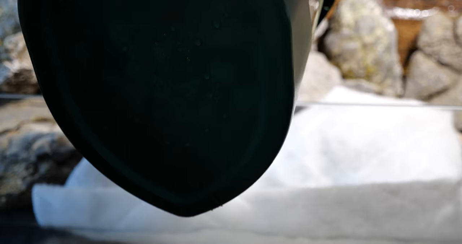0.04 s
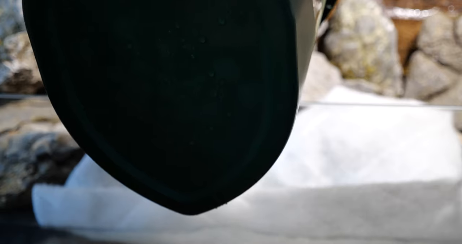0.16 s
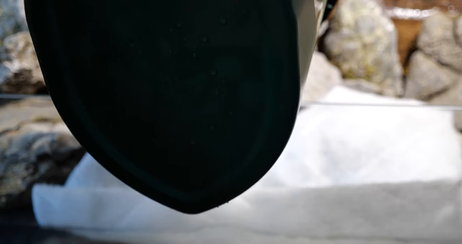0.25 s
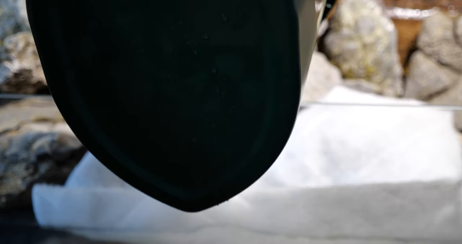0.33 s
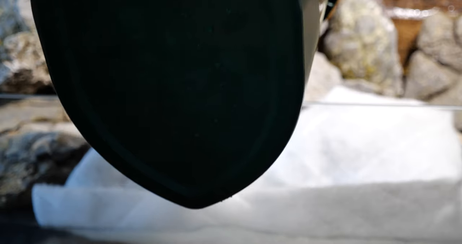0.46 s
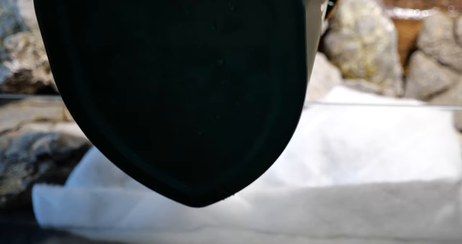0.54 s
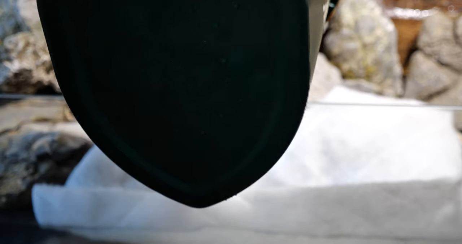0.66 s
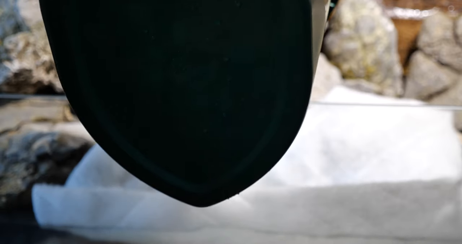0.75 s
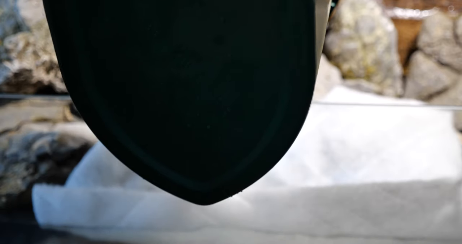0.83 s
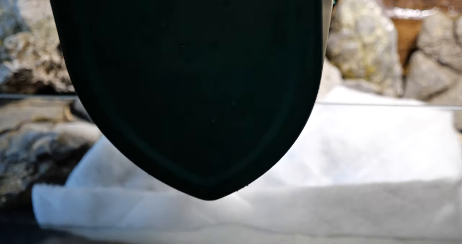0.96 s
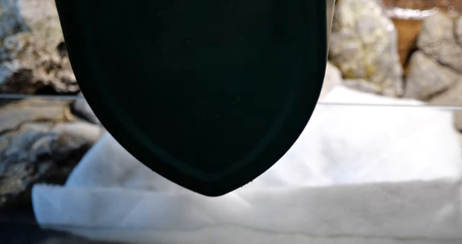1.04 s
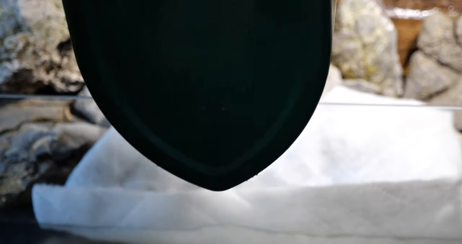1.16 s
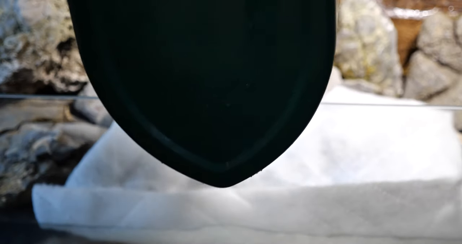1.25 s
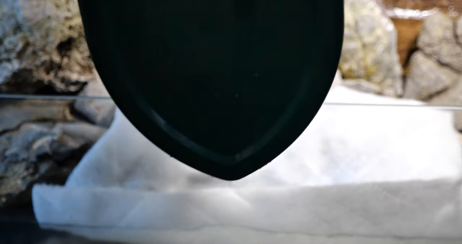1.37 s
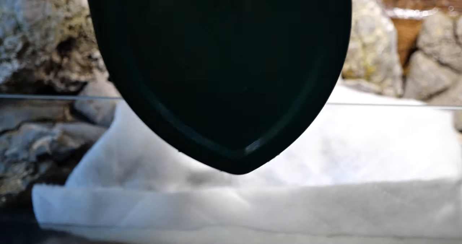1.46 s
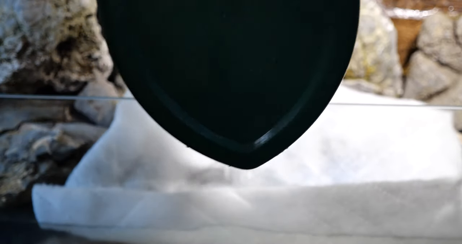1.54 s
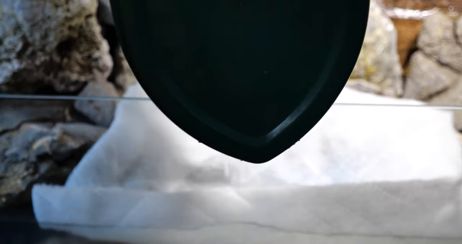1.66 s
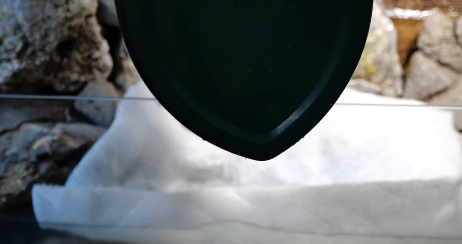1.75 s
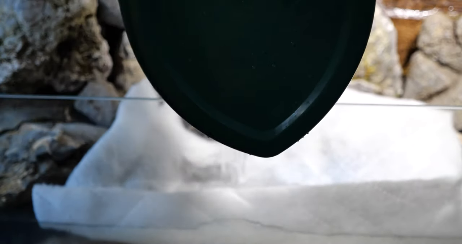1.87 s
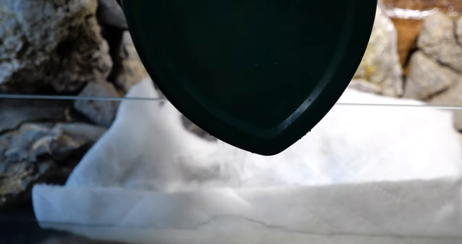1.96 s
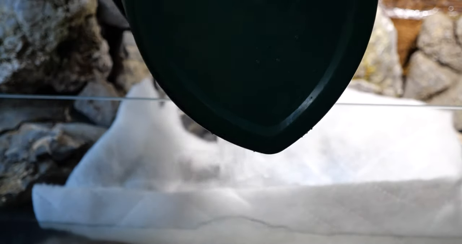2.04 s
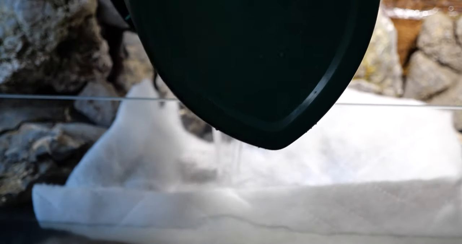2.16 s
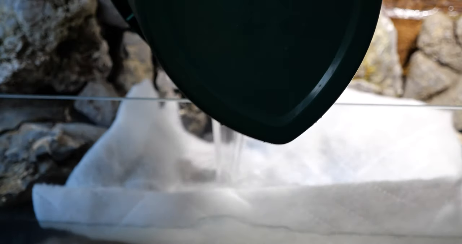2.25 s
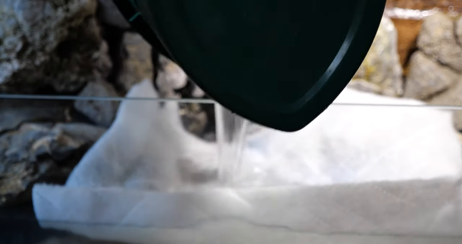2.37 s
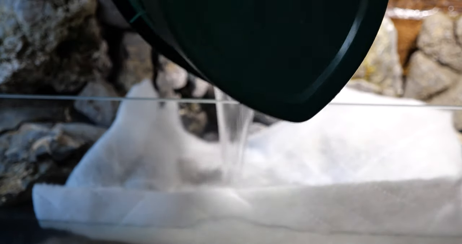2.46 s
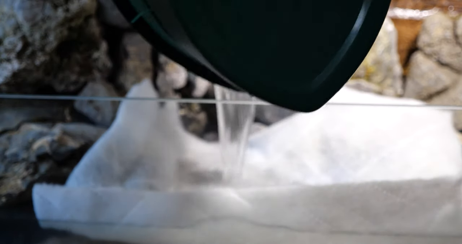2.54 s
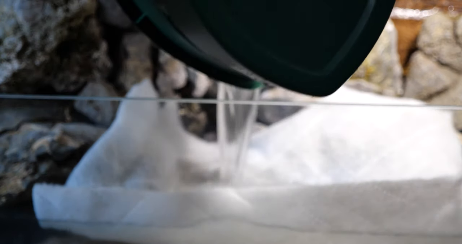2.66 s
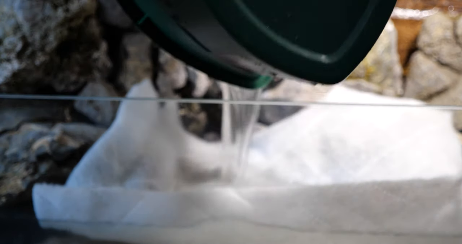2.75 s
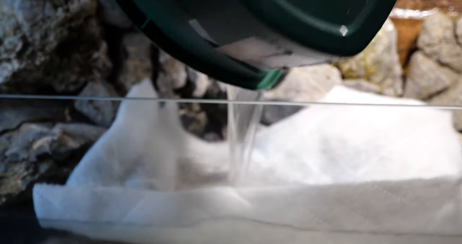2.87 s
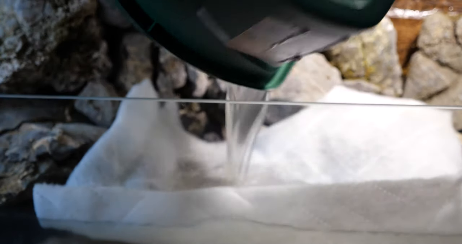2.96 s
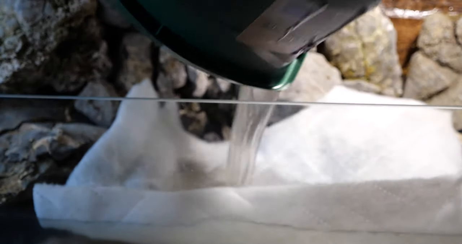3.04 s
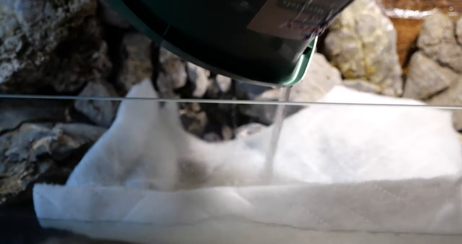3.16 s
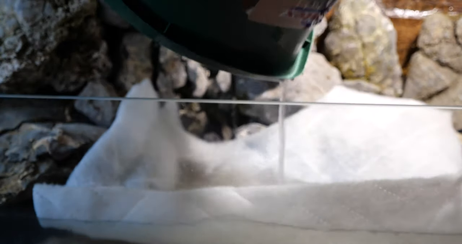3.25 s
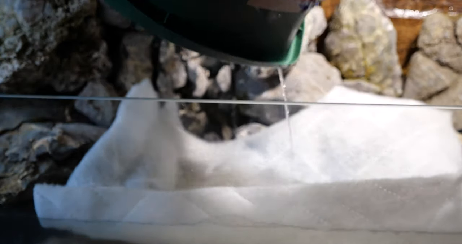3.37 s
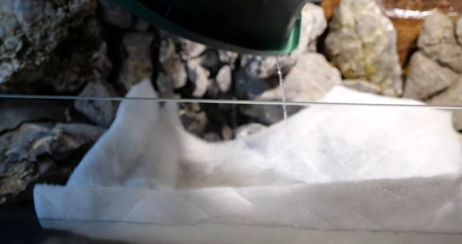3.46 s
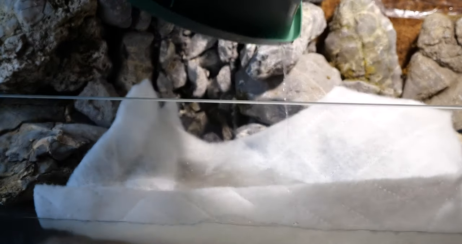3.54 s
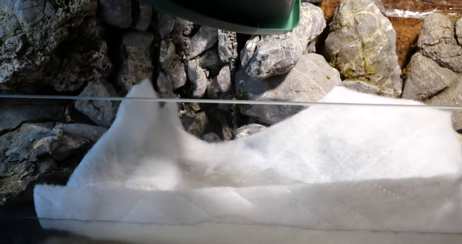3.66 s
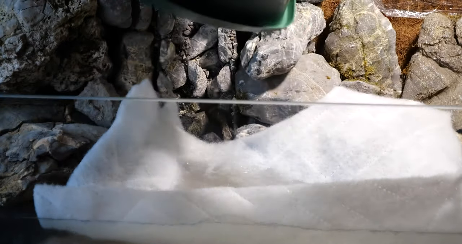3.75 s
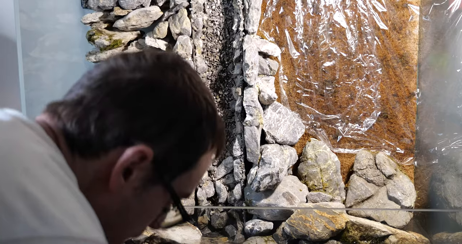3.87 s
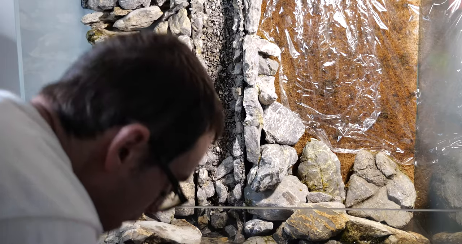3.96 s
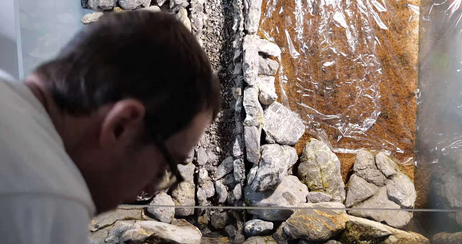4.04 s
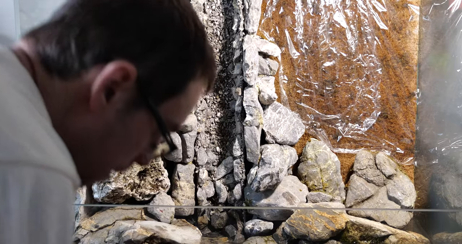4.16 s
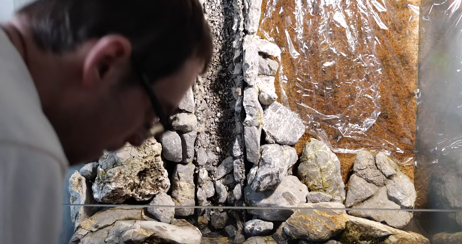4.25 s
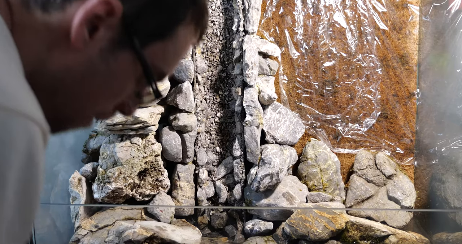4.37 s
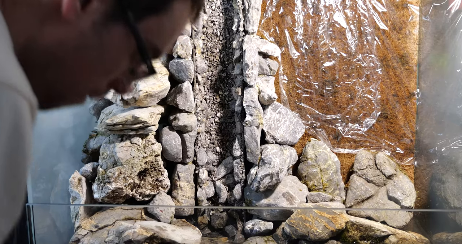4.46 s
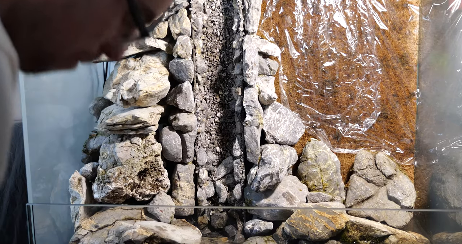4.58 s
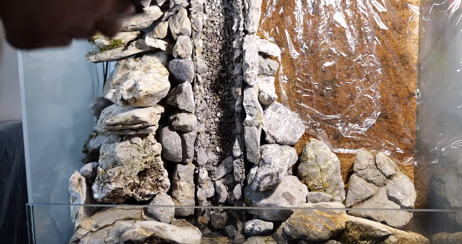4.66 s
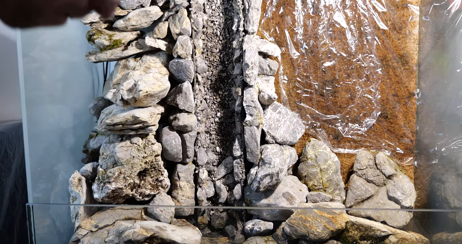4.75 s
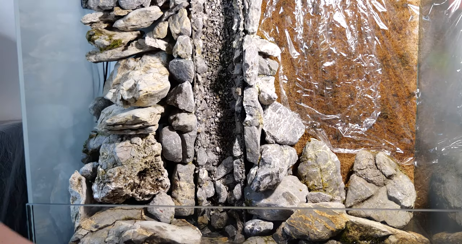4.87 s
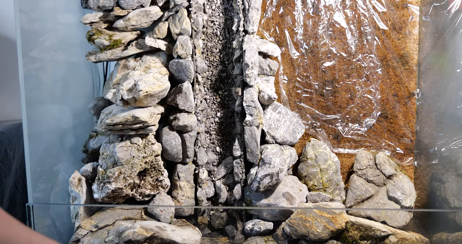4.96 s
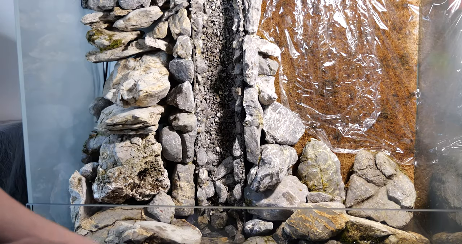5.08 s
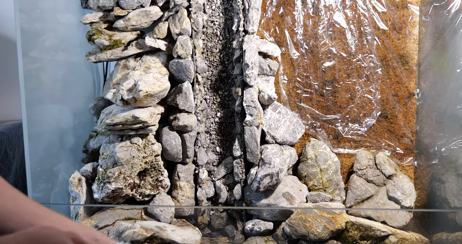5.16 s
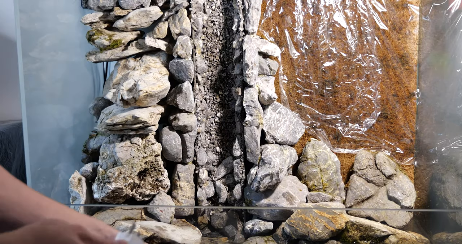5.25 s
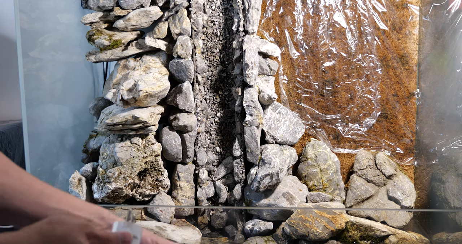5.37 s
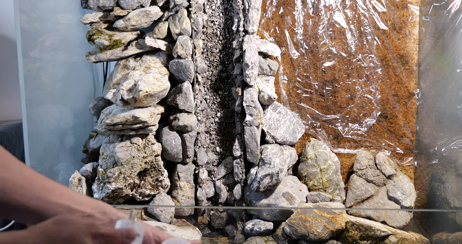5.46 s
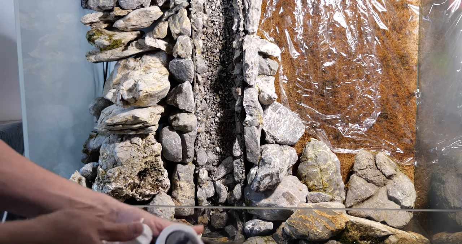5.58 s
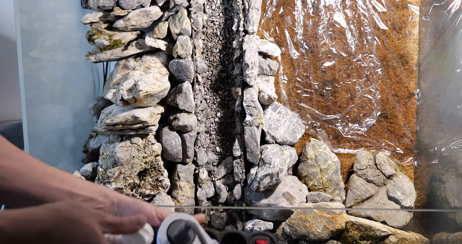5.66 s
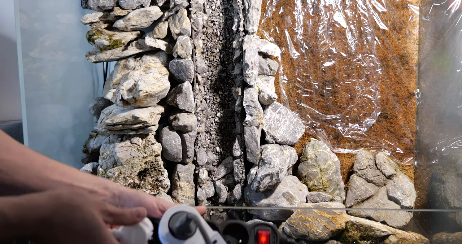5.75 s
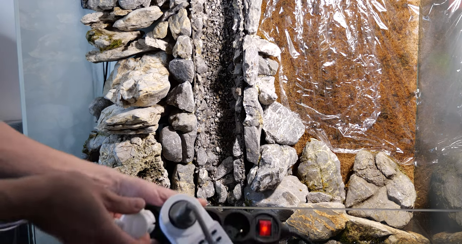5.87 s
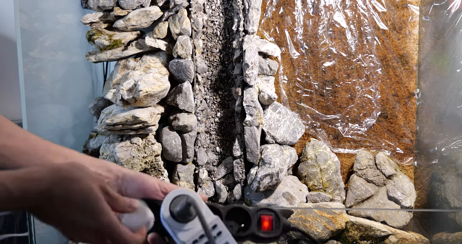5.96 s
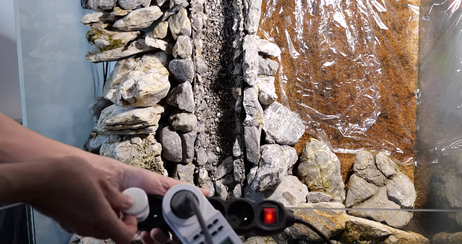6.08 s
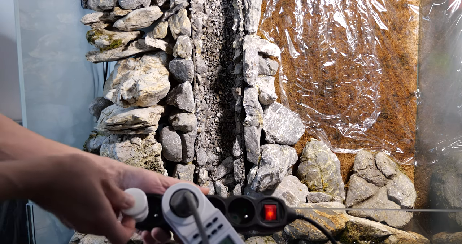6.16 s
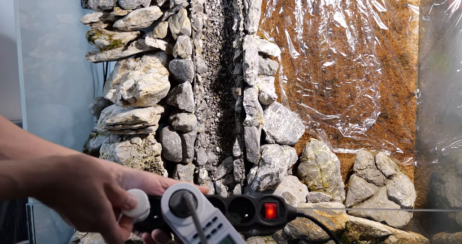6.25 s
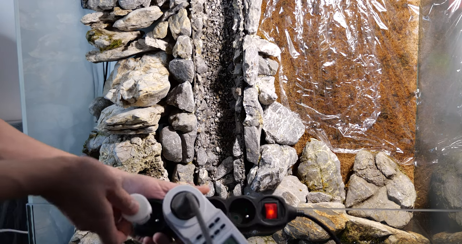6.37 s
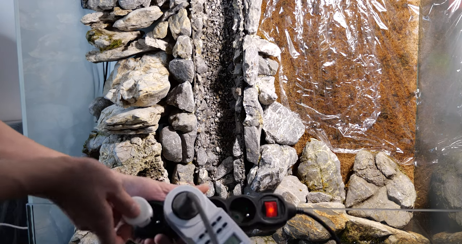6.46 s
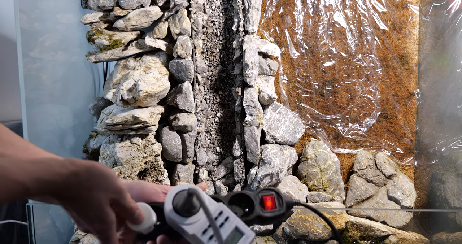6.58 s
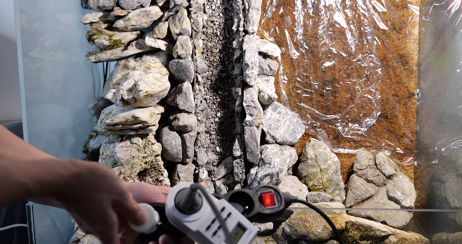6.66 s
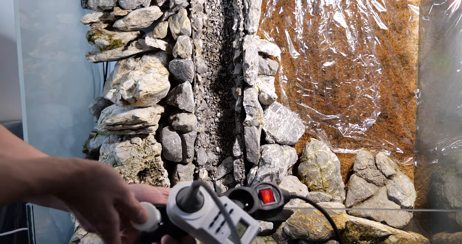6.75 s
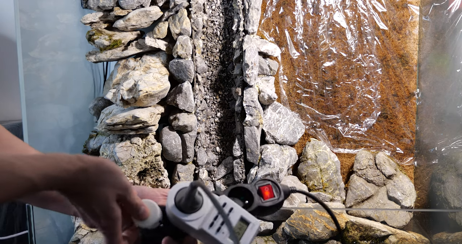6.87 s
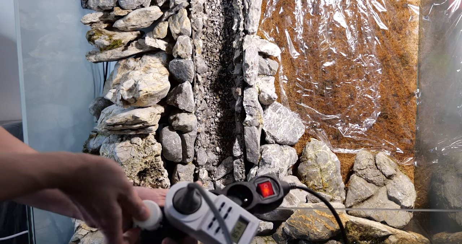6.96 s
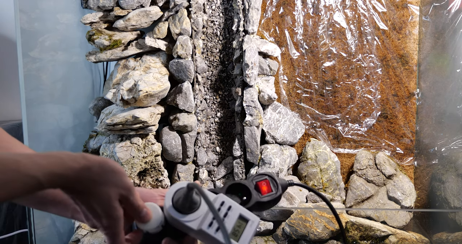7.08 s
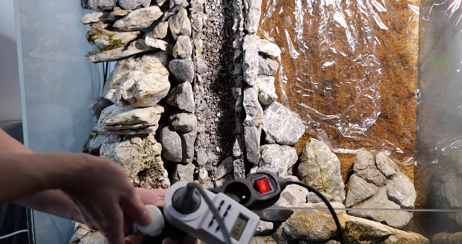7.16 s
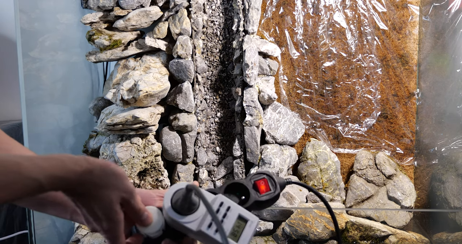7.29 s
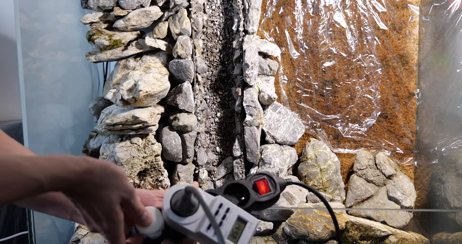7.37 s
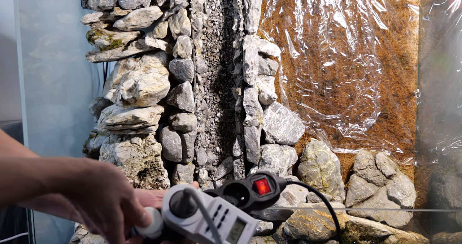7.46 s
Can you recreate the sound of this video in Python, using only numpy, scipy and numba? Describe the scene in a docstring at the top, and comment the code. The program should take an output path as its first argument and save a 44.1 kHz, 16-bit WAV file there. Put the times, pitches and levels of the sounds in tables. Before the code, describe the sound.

Gurgling, splashing water trickles out, followed by a sharp hollow bucket knock, a short scrape and light plastic handling in a small room.

```python
"""Water gurgles, sprays and splashes from a bucket onto fleece in a glass tank, then thins to drips.
The empty bucket is set down and slid away; hands knock and shuffle a plastic power strip; a small
room hums. Each bubble rings as a damped oscillator, higher the smaller it is. The bucket booms as a
cavity resonator; impact and friction excite the modes of the plastic."""
import sys
import numpy as np
from scipy import signal
from scipy.fft import rfft, irfft
from scipy.io import wavfile
from scipy.ndimage import uniform_filter1d
from numba import njit

SR = 44100
rng = np.random.default_rng(int(sys.argv[2]) if len(sys.argv) > 2 else 0)


def log_audio(samples):
    """Write samples as a 16-bit WAV file to the path given in sys.argv[1]."""
    # one column per channel
    frames = np.atleast_2d(samples).T
    # limit to full scale, then quantise
    limited = np.clip(frames, -1, 1)
    pcm = np.round(limited * 32767).astype(np.int16)
    wavfile.write(sys.argv[1], SR, pcm)


N = 331632
TIME_S = np.arange(N) / SR
STILL_S = 3.6  # from here on drips fall into still water
TOP_HZ = 15800

# spectrum of fine spray: frequency_hz, density_db
SPRAY_SPECTRUM = [(2650, -5.5), (4500, -0.5), (6590, -8), (9390, -2.5), (12500, -3.5), (14800, -10),
                  (15700, -10.5)]
# resonances of the bucket's air and bottom: frequency_hz, width_hz, gain_db
BUCKET_MODES = [(313, 28, 13), (241, 36, -12), (139, 30, -13)]
# spectrum of the bucket's scrape and wet smack: frequency_hz, density_db
SCRAPE_SPECTRUM = [(120, -44.5), (250, -14), (400, -3), (650, 2.5), (1250, -7.5), (1700, -11), (2300, -19),
                   (4000, -74.5)]
# modes of the hard plastic: frequency_hz, gain_db, t60_s
PLASTIC_MODES = [(448, 1, 0.11), (681, 8.5, 0.024), (864, 8, 0.04), (1065, 5, 0.031), (1240, 6.5, 0.05),
                 (1483, 1.5, 0.052), (1655, -0.5, 0.063), (1824, 0.5, 0.058), (2270, 7.5, 0.032),
                 (2740, -3.5, 0.14), (4125, 5, 0.041), (4460, -11, 0.064), (5760, -6, 0.059)]
# spectrum of rustles and ticks on the plastic: frequency_hz, density_db
RUSTLE_SPECTRUM = [(400, -56), (1000, -15), (1900, -0.5), (3500, -3.5), (5500, -11), (12000, -40),
                   (15700, -36)]


def stream():
    """Air entrainment: the falling jet drives swarms of small and large bubbles and throws off mist."""
    # course of the pour: time_s, gurgle_db, deep_relative_db, spray_relative_db
    pour = [(0, -38, -10, -2), (0.42, -37.5, -12, -4.5), (0.56, -48, -3.5, 5.5), (0.64, -40, -8.5, 0.5),
            (0.69, -45, -5, 0), (0.78, -39.5, -11, -2), (0.9, -45, -10.5, -2.5), (1.06, -38.5, -10, -6),
            (1.26, -48, -9.5, -0.5), (1.5, -48, -5.5, 3), (1.62, -42.5, -7.5, -8.5),
            (1.7, -44.5, -9.5, -6.5), (1.82, -43, -2.5, -7), (2.13, -46.5, -11.5, -1.5),
            (2.24, -41, -9, -4.5), (2.4, -46, -7, -7.5), (2.55, -41.5, -8, -2), (2.62, -43, -19.5, -7.5),
            (2.74, -45.5, -8, -3.5), (2.9, -42.5, -14.5, -4), (3.08, -36.5, -10, -2),
            (3.17, -40.5, -5.5, -10), (3.25, -34, -8, -8.5), (3.42, -49, -1.5, -3), (3.5, -64.5, 0, 10.5),
            (3.82, -75.5, -3, 11.5)]
    # spectrum of small bubbles: frequency_hz, density_db
    small_spectrum = [(710, -42), (1200, -3.5), (1530, -2.5), (1660, -2), (1920, 2), (2510, -1), (3350, 0),
                      (7000, -9.5), (9100, -26), (15400, -120)]
    # spectrum of large bubbles: frequency_hz, density_db
    large_spectrum = [(60, -50), (100, -3.5), (170, -1.5), (330, -6), (560, -12.5), (760, 0), (1150, -1),
                      (1600, -7), (3000, -60)]
    gate, db, deep_db, spray_db = curves(pour)
    db = db + 2.5 * breakup() * walk(9)  # the stream sputters
    small = swarm([(800, -38)] + small_spectrum, 10000, low_hz=1295, span=4.99, patchy_db=4, wash_db=-7)
    large = swarm(large_spectrum, 2000, low_hz=180.6, span=7, patchy_db=3.5, wash_db=5)
    mist = swarm([(3000, -28)] + SPRAY_SPECTRUM, 6000, low_hz=5230, span=2.64, patchy_db=5.5, wash_db=0)
    gurgle = gate * undb(db) * (small + undb(deep_db) * large)
    return gurgle + spray(mist, flow=gate * undb(db + spray_db))


def breakup():
    """Jet instability: the stream starts even and grows patchy, on a scale of 0 to 1."""
    return np.interp(TIME_S, [0.4, 0.61], [0.22, 1])


def swarm(spectrum, count, low_hz, span, patchy_db, wash_db):
    """Bubble resonance: smaller bubbles ring higher and die sooner; each size range comes in patches."""
    when, pitch, strength = rng.random((count, 3)).T
    hz = low_hz * span ** pitch
    size = hz * undb(12 * strength)  # equal energy per Hz before colouring
    bubbles = rings(when * N / SR, hz, 40 / hz, size, rise_s=0.001, glide=0.27)
    even = colour(unit(bubbles) + undb(wash_db) * grit(1.6), spectrum)
    bands_hz = low_hz * span ** np.linspace(0, 1, 7)
    patches = (undb(patchy_db * walk(16) * breakup()) * resonate(even, [(f, f / 3, 0)]) for f in bands_hz)
    return unit(sum(patches))


def spray(mist, flow):
    """Atomisation: mist follows the flow; each splash adds a ping, a puff and a shower of droplets."""
    # bright splashes: start_s, level_db, pitch_hz
    splashes = [(0.0478, -36, 8340), (0.0892, -35, 9700), (0.626, -25.5, 9160), (0.9517, -35, 8500),
                (1.071, -30.5, 6200), (1.13, -46, 9500), (1.205, -38, 9000), (1.322, -37, 10500),
                (1.345, -37, 8800), (1.45, -40, 8300), (1.4686, -41, 9500), (1.675, -38, 8730),
                (1.699, -36, 12500), (1.76, -39, 7920), (1.785, -29, 11500), (1.84, -44, 9200),
                (1.8856, -38, 9260), (1.925, -32.5, 6800), (1.955, -31.5, 6270), (2.04, -31, 9500),
                (1.997, -28, 9370), (2.0887, -26.5, 9240), (2.172, -35, 10000), (2.2205, -29.5, 7500),
                (2.3523, -29.5, 7400), (2.399, -30, 10000), (2.4319, -30, 11050), (2.469, -31, 9200),
                (2.668, -34, 8400), (2.723, -32, 10600), (2.8025, -33, 7500), (2.9687, -25.5, 9200),
                (2.988, -27, 8600), (3.005, -25.5, 8180), (3.047, -35, 10500), (3.0694, -30, 6300),
                (3.1, -24.5, 7730), (3.189, -29, 5040), (3.269, -29, 9070), (3.308, -36, 12200),
                (3.3743, -31, 7300), (3.4904, -38, 10400)]
    s, db, hz = np.transpose(splashes)
    when, size = rng.random((50, 2)).T  # small spatters at random moments
    spatter = 1 + bursts(when * STILL_S, 2 * size * undb(-2), t60_s=0.03)
    puffs = bursts(s, undb(db - 12), t60_s=0.03)
    pings = rings(s, hz, 0.0083, undb(db + 3.5), rise_s=0.00015, glide=0.043)
    delay, pitch, weakness = rng.random((len(s), 3, 22)).swapaxes(0, 1)
    droplet_s = s[:, None] + 0.045 * delay
    droplet_hz = np.minimum(hz[:, None] * (1 + 0.18 * (2 * pitch - 0.8)), TOP_HZ)
    droplet_db = db[:, None] - 1 - 11 * delay - 5.6 * weakness
    droplets = rings(droplet_s, droplet_hz, 0.0071, undb(droplet_db), rise_s=0.0004, glide=0.09)
    return mist * (flow * spatter + puffs) + pings + droplets


def single_bubbles():
    """Fragmentation: a loud bubble splits into weaker ones of nearly its pitch."""
    # large bubbles and drips: start_s, level_db, pitch_hz
    bubbles = [(0.141, -29.5, 780), (0.225, -32, 890), (0.26, -32.5, 760), (0.316, -30, 840),
               (0.338, -28, 760), (0.398, -30, 796), (0.439, -26, 3420), (0.527, -36, 1640),
               (0.807, -37, 1880), (0.805, -26.5, 2800), (0.921, -28.5, 3900), (0.99, -26, 3170),
               (1.183, -35, 2320), (1.303, -31, 3350), (1.38, -35, 1020), (1.49, -31, 5200),
               (1.554, -32, 3360), (1.572, -37, 750), (1.62, -31, 780), (1.65, -32.5, 766),
               (1.66, -27, 1720), (1.69, -28, 1790), (1.779, -29.5, 1240), (1.81, -31, 1180),
               (1.898, -33, 637), (1.93, -36.5, 492), (1.993, -31.5, 712), (2.019, -28.5, 1500),
               (2.033, -27, 2790), (2.035, -26.5, 4630), (2.103, -30.5, 1470), (2.196, -30, 2060),
               (2.233, -26.5, 1490), (2.264, -27.5, 864), (2.426, -31, 2730), (2.472, -27, 2780),
               (2.528, -31, 3200), (2.545, -29, 900), (2.544, -21.5, 1366), (2.671, -28, 1500),
               (2.682, -25.5, 1960), (2.745, -22.5, 1850), (2.805, -29.5, 1810), (2.872, -28, 1400),
               (2.963, -25, 3980), (2.997, -24, 4970), (3.022, -21, 1860), (3.074, -22.5, 3320),
               (3.152, -31.5, 663), (3.198, -26, 2520), (3.212, -30, 720), (3.215, -29, 2100),
               (3.224, -28, 1060), (3.241, -31, 1080), (3.263, -33, 728), (3.306, -34, 460),
               (3.366, -31.5, 464), (3.398, -35.5, 507), (3.435, -34, 1630), (3.42, -35.5, 960),
               (3.458, -37, 3220), (3.655, -49.5, 1007), (6.472, -51, 4460), (6.581, -41.5, 3650)]
    s, db, hz = np.transpose(bubbles)[:, :, None]
    delay, detune = np.hsplit(rng.random((len(s), 8)), 2)
    piece = np.arange(4)
    still = s > STILL_S  # drips into still water scatter less and ring longer
    piece_s = s + 0.016 * piece * delay
    piece_hz = hz * (1 + (0.08 - 0.053 * still) * piece * (detune - 0.4))
    piece_db = db - (2.5 + 6.8 * still) * piece
    t60_s = 18 / hz + 0.0077 + 0.036 * still
    churn = undb(2.9 * walk(150))  # the moving surface roughens the ring
    return churn * rings(piece_s, piece_hz, t60_s, undb(piece_db), glide=0.035)


def plinks():
    """Secondary droplets: each drop throws up a few more, higher and weaker than the first."""
    # wet ticks: start_s, level_db, lowest_pitch_hz
    drops = [(0.639, -18.5, 3230), (0.647, -23.5, 4330), (1.33, -27, 3370), (3.385, -23, 4420),
             (3.49, -28.5, 4060), (3.7, -40.5, 3880), (3.745, -45, 4360), (7.392, -40.5, 4430)]
    s, db, hz = np.transpose(drops)[:, :, None]
    secondary = np.arange(8) > 0
    delay, pitch = rng.random((len(s), 2, 8)).swapaxes(0, 1) * secondary
    size = undb(db - 8.4 * pitch - 5.1 * delay)
    return rings(s + 0.025 * delay ** 2, hz * (1 + 0.363 * pitch), 0.015, size, rise_s=0.00079, glide=0.12)


def slaps():
    """Impulse response: water strikes the bucket with a wet smack and rings its air and bottom."""
    # slaps of water: start_s, level_db, pitch_hz, rise_s, t60_s, smack_relative_db
    impacts = [(0.522, -35.5, 260, .003, .06, -4), (0.727, -13.5, 318, .022, 0.12, -25),
               (1.378, -30.5, 324, 0.0073, 0.1, -11), (1.984, -46, 262, .009, .14, -9),
               (2.359, -36, 317, 0.011, 0.18, -14), (2.798, -39, 330, 0.0082, 0.12, -5),
               (3.309, -24, 204, 0.0067, 0.026, -14)]
    bottom_hz = BUCKET_MODES[2][0]
    boom = sum(rings(s, [hz, 204, bottom_hz], t60_s, undb([db, db - 11.5, db - 12]), rise_s)
               for s, db, hz, rise_s, t60_s, _ in impacts)
    s, db, *_, smack_db = np.transpose(impacts)
    smack = bursts(s, undb(db + smack_db), t60_s=0.05) * unit(colour(grit(1.8), SCRAPE_SPECTRUM))
    return boom + smack


def slosh():
    """Cavity resonance: the air in the bucket narrows the noise of surging water to a low band."""
    # surges of water: start_s, hold_s, level_db
    surges = [(0.434, 0.015, -52), (0.766, 0.086, -47), (0.941, .01, -49), (1.23, .01, -54.5),
              (1.4, 0.095, -48.5), (2.3, 0.14, -46.5), (2.51, 0.0091, -52), (2.792, 0.018, -47.5),
              (2.995, 0.17, -53.5), (3.327, .02, -56)]
    envelope = swells(*np.transpose(surges), rise_db_per_s=402, fall_db_per_s=164)
    cavity = resonate(resonate(grit(1.4), [(321, 90, 0)]), [(311, 53, 0)])
    return envelope * unit(cavity) * undb(4 * walk(30))


def rim_bumps():
    """Impact and damping: the bucket clicks, thuds and booms on the table until it rests flat."""
    # contacts of the rim: start_s, level_db, click_hz, boom_relative_db, thud_relative_db
    bumps = [(4.416, -32, 1450, -13, -21.5), (4.442, -26.5, 904, -0.5, -15.5),
             (4.484, -15.5, 1510, -10.5, -16), (4.5268, 9, 1107, -21, -10), (4.547, -11, 725, -19, -22),
             (4.574, -10.5, 900, 0.5, -19.5), (4.588, -4.5, 750, -15.5, -16.5), (4.599, -13, 695, 5, -14),
             (4.736, -21, 880, -30, -25)]
    rest_s, damping_db_per_s = 4.64, 500
    s, db, hz, boom_db, thud_db = np.transpose(bumps)
    click = rings(s, hz, 0.0054, undb(db), rise_s=0.00053)
    overtone = rings(s, 1.95 * hz, 0.007, undb(db - 14), rise_s=0.00032)
    boom = rings(s, BUCKET_MODES[0][0], 0.16, undb(db + boom_db), rise_s=0.0026)
    damping = undb(-damping_db_per_s * np.maximum(TIME_S - rest_s, 0))
    thud = rings(s + 0.00077, 380, 0.014, undb(db + thud_db), rise_s=0.0012)
    return click + overtone + damping * boom + thud


def bucket_slide():
    """Stick-slip friction: dragging the bucket drives its boom and a gritty scrape."""
    # course of the slide: time_s, boom_db, scrape_relative_db, grit_relative_db
    slide = [(4.3, -71.5, 6, 8), (4.38, -65, 9, 6.5), (4.43, -54, 8.5, 1.5), (4.452, -34, -3, -9.5),
             (4.474, -34, -2.5, -20), (4.481, -26.5, -3.5, -7), (4.535, -18.5, -2.5, -17.5),
             (4.565, -19, -5, -18.5), (4.605, -22.5, 0, -19.5), (4.641, -27, -9.5, -14.5),
             (4.7, -52, 3, 2.5), (4.8, -51, 0.5, -6), (4.858, -43, -3.5, -17), (4.928, -38, -8.5, -4),
             (4.986, -49, -2.5, -6), (5.05, -72, 9, 5)]
    # spectrum of the grit: frequency_hz, density_db
    grit_spectrum = [(400, -58.5), (900, -31), (1550, -9), (2200, -9), (3200, -8.5), (7000, -24),
                     (11700, -22.5), (15700, -38.5)]
    gate, db, scrape_db, grit_db = curves(slide)
    boom = unit(resonate(resonate(grit(1.7), BUCKET_MODES), [(285, 280, 0.0046), (143, 43, 0.0059)]))
    slips = grit(2.0) * undb(2.54 * walk(60))
    scrape = undb(scrape_db) * unit(colour(slips, SCRAPE_SPECTRUM))
    grains = undb(grit_db) * unit(colour(slips, grit_spectrum))
    return gate * undb(db) * (boom + scrape + grains)


def hands():
    """Friction noise: skin and cable rub and rustle on the strip; a hollow part resonates as it drags."""
    # strokes of the hands: start_s, hold_s, level_db, rustle_relative_db
    strokes = [(3.855, 0.011, -54.5, 0.5), (3.989, 0.03, -43.5, -16), (4.2, 0.047, -67, -0.5),
               (5.072, 0.36, -60.5, -6.5), (5.44, 0.22, -54, -5), (5.69, 0.07, -48.5, -12),
               (5.896, 0.12, -72, 2), (6.076, 0.03, -62, -13), (6.233, 0.15, -65.5, -6.5),
               (6.555, .01, -55, -8), (6.617, 0.17, -65.5, -6), (6.865, 0.0076, -44.5, -5.5),
               (6.992, 0.08, -49.5, -7.5), (7.121, 0.17, -55.5, -4), (7.34, 0.096, -53.5, -4.5),
               (7.477, 0.016, -52.5, -13)]
    # spectrum of the dull rub: frequency_hz, density_db
    rub_spectrum = [(100, -52), (200, -6), (450, 3.5), (700, 3), (1200, -3), (1800, -15.5), (5000, -60)]
    # course of the drag over the table: time_s, level_db
    drag_levels = [(5.37, -53), (5.45, -54), (5.528, -39.5), (5.568, -50.5), (5.62, -43), (5.658, -49),
                   (5.695, -42), (5.76, -41.5), (5.78, -51), (5.83, -65)]
    # resonance of the hollow part: frequency_hz, width_hz, gain_db
    hollow = [(716, 147, 0)]
    friction = grit(1.63) * undb(2.4 * walk(40))
    gate, drag_db = curves(drag_levels)
    drag = gate * undb(drag_db) * unit(resonate(resonate(friction[::-1], hollow), hollow))
    ringing = resonate(friction, [(hz, 40, db) for hz, db, _ in PLASTIC_MODES])
    rub = unit(colour(friction, rub_spectrum)) + undb(-10.5) * unit(colour(ringing, rub_spectrum))
    rustle = unit(colour(friction, RUSTLE_SPECTRUM))
    s, hold_s, db, rustle_db = np.transpose(strokes)
    return drag + swells(s, hold_s, db) * rub + swells(s, hold_s, db + rustle_db) * rustle


def knocks():
    """Modal vibration: a blow rings the plastic's modes near its centre, with a thud, tick and rattle."""
    # blows on the strip: start_s, level_db, centre_hz, thud_relative_db, tick_relative_db,
    # rattle_relative_db, free_share (of the ring that the grip leaves)
    blows = [(4.103, -32, 950, -12, -13, -6, 0.37), (5.301, -23.5, 633, -1, -20, -5, 0.5),
             (5.329, -21.5, 537, -9, -32, -6.5, 0.38), (6.049, -54, 1830, -7.5, -16, -6, 0.55),
             (6.113, -34, 1850, -36, -7, -9.5, 0.84), (6.155, -33, 1750, -3.5, -5.5, -5, 0.57),
             (6.331, -51.5, 1590, -10.5, -15, -12, 0.44), (6.487, -27.5, 1010, -32, -28.5, -7, 0.52),
             (6.831, -37, 1500, -33, -17, -6, 0.35), (6.853, -41.5, 1980, -30, -15, -12, 0.6),
             (6.871, -31, 850, -38, -31, -10, 1), (6.971, -47, 2200, -12, -16, -16, .4),
             (6.998, -27, 1840, -12, -11.5, -12.5, 0.39), (7.266, -30, 1020, -20, -10, -3.5, 0.64)]
    s, db, centre_hz, thud_db, tick_db, rattle_db, free = np.transpose(blows)[:, :, None]
    hz, mode_db, t60_s = np.transpose(PLASTIC_MODES)
    uneven, detune, delay = rng.standard_normal((len(s), len(hz), 3)).transpose(2, 0, 1)
    octaves_off = np.abs(np.log2(hz / centre_hz))
    ring_db = db + mode_db - 12 * octaves_off + 2.2 * uneven
    ring_s = s + 0.001504 * np.abs(delay)  # an unclean contact staggers the modes
    ring_hz = hz * (1 + 0.064 * (1 - free) * detune)
    body = rings(ring_s, ring_hz, t60_s * np.clip(free, 0.2, 1), undb(ring_db), rise_s=0.0016)
    thud = rings(s, BUCKET_MODES[0][0], 0.088, undb(db + thud_db), rise_s=0.0023)
    tick_envelope = bursts(s[:, 0] + 0.0029, undb(db + tick_db)[:, 0], t60_s=0.062)
    tick = tick_envelope * unit(colour(grit(0.94), RUSTLE_SPECTRUM))
    loose_db = db + rattle_db - 3.5 - 10 * octaves_off + 1.6 * uneven
    return body + thud + tick + rattle(s[:, 0] + 0.0012, hz, loose_db)


def rattle(start_s, modes_hz, levels_db):
    """Forced vibration: chattering loose parts keep the modes sounding after each blow."""
    chatter, width_hz, out = grit(2.54), 190, 0
    for hz, db in zip(modes_hz, levels_db.T):
        mode = [(hz, width_hz, 0)]
        out = out + unit(resonate(resonate(chatter, mode), mode)) * bursts(start_s, undb(db), t60_s=0.16)
    return out


def ticks():
    """Amplitude modulation: treble noise is shaped into the snaps and faint hisses of handling."""
    # fine bright snaps: start_s, level_db
    snaps = [(4.098, -52), (4.3448, -59), (4.4192, -54), (4.484, -42), (5.205, -57), (5.8649, -65),
             (6.1128, -52), (6.4884, -59), (6.5708, -55), (6.678, -70), (6.8307, -61), (7.001, -45),
             (7.2672, -48), (7.3894, -57)]
    # faint hisses: start_s, hold_s, level_db
    hisses = [(5.095, 0.27, -67.5), (5.9, .15, -69)]
    s, db = np.transpose(snaps)
    envelope = bursts(s, undb(db), t60_s=0.042) + swells(*np.transpose(hisses))
    return envelope * unit(colour(grit(2.0), [(3000, -27.5)] + SPRAY_SPECTRUM))


def crackle():
    """Gated noise: one short dry burst with hard edges and no tail."""
    # spectrum of the burst: frequency_hz, density_db
    spectrum = [(35, -1), (70, -6), (150, 4.5), (853, -5.5), (1080, 1.5), (1800, 3), (2120, -15),
                (3070, -5), (4780, -25), (5370, -18), (11100, -22), (15700, -38)]
    gate = (TIME_S > 3.853) & (TIME_S < 3.8607)
    return gate * undb(-23) * unit(colour(rng.standard_normal(N), spectrum))


def motor_hum():
    """Rotational tone: a motor wavers in pitch and level, blurred by its own narrow-band rumble."""
    hum_hz, hum_db = 248, -64
    cycles = np.cumsum(hum_hz + 2.79 * walk(5.2)) / SR
    tone = np.sqrt(2) * undb(2.8 * walk(11)) * np.sin(2 * np.pi * cycles)
    rumble = undb(-1) * unit(resonate(rng.standard_normal(N), [(hum_hz, 22, 0)]))
    return undb(hum_db) * (tone + rumble)


def room_tone():
    """Ambient noise: a broadband floor whose level drifts slightly."""
    # spectrum of the room's background: frequency_hz, density_db
    spectrum = [(40, -56.5), (85, -20.5), (130, -25), (190, -27), (280, -14), (460, -15.5), (640, -24),
                (930, -27), (1870, -24), (2350, -29), (5090, -31.5), (11900, -29), (15700, -40)]
    return undb(-61.5 + 1.2 * walk(4)) * unit(colour(rng.standard_normal(N), spectrum))


def echoes(direct):
    """Reverberation: convolution with a diffuse tail of unit energy, each octave with its own decay."""
    # reverberation times: frequency_hz, t60_s
    decay_times = [(150, 0.075), (1000, 0.18), (4000, 0.22), (12000, 0.087)]
    hz, t60_s = np.transpose(decay_times)
    t, tail = np.arange(SR // 2) / SR, 0
    for f in 125 * 2. ** np.arange(8):
        decay = 10 ** (-3 * t / np.interp(np.log(f), np.log(hz), t60_s))
        band = resonate(rng.standard_normal(len(t)), [(f, f * 0.7, 0)]) * decay * np.minimum(t / 0.0013, 1)
        energy = f * min(f / 700, 1) ** 4  # the nearby bass arrives mostly direct
        tail = tail + band * np.sqrt(energy / np.sum(band ** 2))
    return signal.fftconvolve(direct, tail / np.sqrt(np.sum(tail ** 2)))[:N]


def undb(db):
    """Amplitude ratio of a level in decibels."""
    return 10 ** (np.asarray(db) / 20)


def unit(x):
    """Normalisation to an RMS of 1."""
    return x / np.sqrt(np.mean(x ** 2))


def curves(table):
    """Linear interpolation: a gate that closes just outside the table, then its columns over time."""
    s, *columns = np.transpose(table)
    gate = np.clip(np.minimum(TIME_S - s[0] + 0.02, s[-1] + 0.02 - TIME_S) / 0.02, 0, 1)
    return [gate] + [np.interp(TIME_S, s, column) for column in columns]


def colour(x, spectrum):
    """Spectral shaping by (frequency_hz, gain_db) points."""
    hz, db = np.transpose(spectrum)
    f = np.arange(len(x) // 2 + 1) * SR / len(x)
    return irfft(rfft(x) * undb(np.interp(np.log(f + 1), np.log(hz), db)), len(x))


def resonate(x, peaks):
    """Parallel resonators, each given as (frequency_hz, width_hz, gain_db)."""
    return sum(undb(db) * signal.lfilter(*signal.iirpeak(hz, hz / width, SR), x) for hz, width, db in peaks)


@njit
def damped_sines(start, hz, t60_s, size, rise_s, glide):
    """Damped oscillators that swell, then decay while the pitch climbs by the share glide."""
    out = np.zeros(N)
    for k in range(len(start)):
        life = int(t60_s[k] * SR)
        phase = 0.
        for i in range(min(life, N - start[k])):
            attack = min(i / (rise_s * SR), 1.)
            out[start[k] + i] += size[k] * np.sin(phase) * 10 ** (-3 * i / life) * attack
            phase += 2 * np.pi * hz[k] * (1 + glide * i / life) / SR
    return out


def rings(start_s, hz, t60_s, size, rise_s=0.0008, glide=0.):
    """Superposition of damped sines, one for each element of the broadcast arguments."""
    start_s, hz, t60_s, size = (1. * a.ravel() for a in np.broadcast_arrays(start_s, hz, t60_s, size))
    return damped_sines((start_s * SR).astype(np.int64), hz, t60_s, size, rise_s, glide)


def walk(rate_hz):
    """Slow random modulation: levels of spread near 1, joined by ramps."""
    step = int(SR / rate_hz)
    return uniform_filter1d(np.repeat(rng.standard_normal(N // step + 1), step), step)[:N]


def grit(scatter_db):
    """Heavy-tailed noise: dense clicks of very uneven size."""
    return rng.standard_normal(N) * undb(scatter_db * rng.exponential(size=N))


def bursts(start_s, size, t60_s):
    """Exponential decay: an envelope that jumps at each event and dies away."""
    kicks = np.zeros(N)
    np.add.at(kicks, (start_s * SR).astype(int), size)
    return signal.lfilter([1], [1, -10 ** (-3 / (t60_s * SR))], kicks)


def swells(start_s, hold_s, db, rise_db_per_s=303, fall_db_per_s=240):
    """Exponential growth and decay: summed envelopes that reach db at start_s, hold and fall."""
    t = np.arange(0, N + 64, 64)[:, None] / SR
    before_db = rise_db_per_s * np.maximum(start_s - t, 0)
    after_db = fall_db_per_s * np.maximum(t - start_s - hold_s, 0)
    return np.interp(TIME_S, t[:, 0], undb(db - before_db - after_db).sum(axis=1))


def scene():
    """Mid-side stereo: two close capsules share the direct sound and differ mainly in the echoes."""
    # gain of the diffuse side signal: frequency_hz, gain_db
    width = [(60, -30), (110, -32), (200, -40), (380, -20), (700, -15), (1290, -8.5), (2380, -8.5),
             (4400, -8.5), (8120, -20), (15000, -1.5)]
    # low mids that the left capsule hears a little more: frequency_hz, width_hz, gain_db
    left_bias = [(895, 550, -21.5)]
    water = stream() + single_bubbles() + plinks()
    bucket = slaps() + slosh() + rim_bumps() + bucket_slide()
    direct = water + bucket + hands() + knocks() + ticks()
    hum, ambience = motor_hum(), room_tone()
    echo_gain = undb(-2.5)
    mid = (direct + echo_gain * echoes(direct)) / np.sqrt(1 + echo_gain ** 2)
    shifting = np.sqrt(2) * np.cos(1.71 * walk(25))  # the echoes shift as things move
    side = colour(shifting * echoes(direct) + ambience[::-1], width) + resonate(mid, left_bias)
    mid = mid + hum + ambience + crackle()
    return np.array([mid + side, mid - side])


def record(dry):
    """Band limiting: the small microphone drops the deep bass; the recorder cuts the top."""
    thin = signal.sosfilt(signal.butter(3, 105, "high", fs=SR, output="sos"), dry)
    return signal.sosfilt(signal.ellip(12, .3, 90, TOP_HZ, fs=SR, output="sos"), thin)


dry = scene()
out = record(dry)
log_audio(out)
```